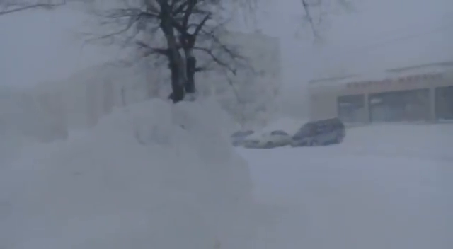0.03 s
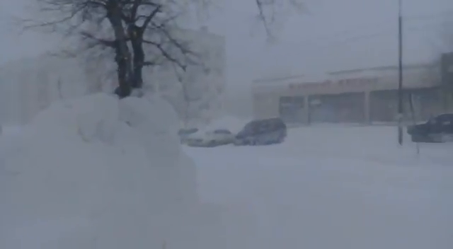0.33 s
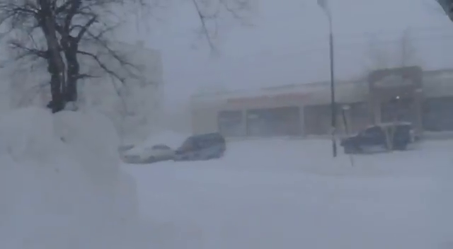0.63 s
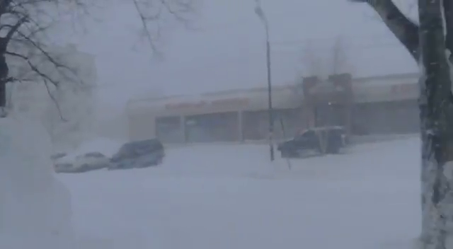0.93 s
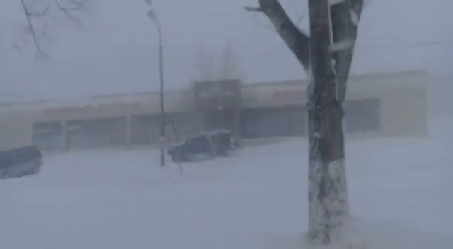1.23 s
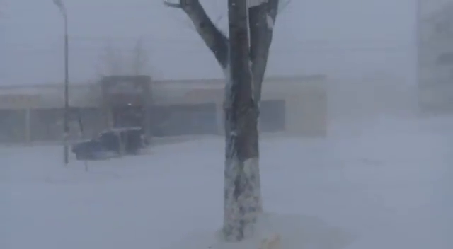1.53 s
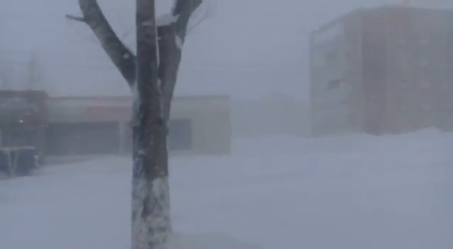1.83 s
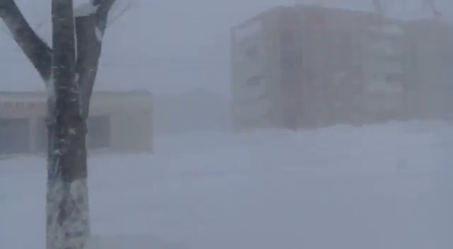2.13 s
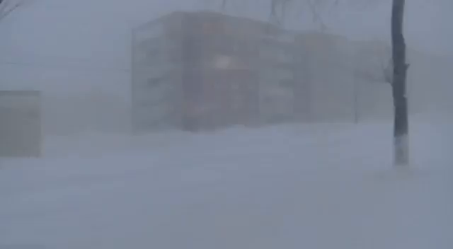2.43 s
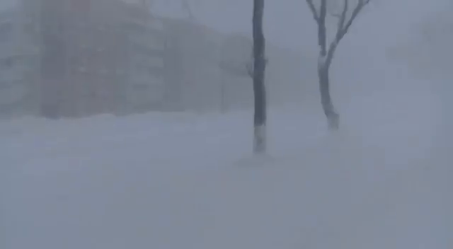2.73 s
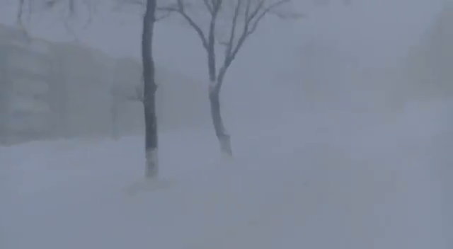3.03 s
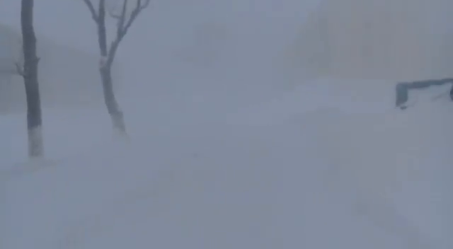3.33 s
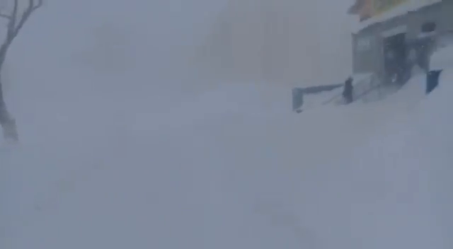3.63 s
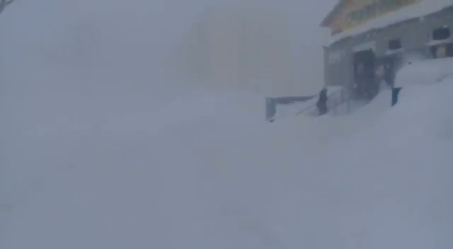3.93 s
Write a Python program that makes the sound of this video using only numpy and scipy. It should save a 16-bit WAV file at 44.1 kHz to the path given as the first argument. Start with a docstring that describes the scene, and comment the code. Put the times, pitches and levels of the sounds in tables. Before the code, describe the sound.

Wind buffets a bare microphone in rough, uneven blasts during a blizzard in town. It then eases to a softer rumble as a hand knocks the case a few times and blown snow faintly hisses and crackles.

```python
"""A blizzard in a town street, heard through a bare hand-held microphone.
At first, gusts drag swirls of air over the microphone's opening, where they flutter and slap;
something rustles briefly. After two seconds it is turned out of the wind, leaving a low rumble
and softer slaps. Then the hand bumps the case a few times, snow ticks and crackles on the opening,
and a second rustle comes near the end. All along, the street roars faintly and blown snow hisses."""
import sys
import numpy as np
from scipy import signal
from scipy.fft import rfft, irfft
from scipy.io import wavfile
from scipy.ndimage import uniform_filter1d, minimum_filter1d, map_coordinates

SR = 44100
rng = np.random.default_rng(int(sys.argv[2]) if len(sys.argv) > 2 else 0)


def to_wav(sig):
    """Store sig (one row per channel, or 1-D mono) as 16-bit WAV at the path in sys.argv[1].

    Samples outside -1..1 are clipped; the rate is SR.
    """
    pcm = np.clip(np.atleast_2d(sig), -1, 1) * 32767
    pcm = np.round(pcm).astype(np.int16)
    wavfile.write(sys.argv[1], SR, pcm.T)  # frames by channels


N = 176400  # four seconds

# Five gusts, one list of rows each. Each row: time in seconds, level in dB, brightness in dB.
GUST_SHAPES = [
    [(0.0, -14.5, -17.5), (0.016, -28, -24.5), (0.03, -22.5, -15), (0.042, -18, -22), (0.076, -16.5, -13),
     (0.088, -8.5, -27.5), (0.098, -30.5, -9.5), (0.124, -25, -31), (0.208, -29, -18), (0.226, -15, -19.5),
     (0.238, -19, -30), (0.266, -40, -26.5), (0.298, -19.5, -42), (0.32, -26.5, -9.5),
     (0.366, -17.5, -37.5), (0.39, -66.5, -21)],
    [(0.39, -39, -16.5), (0.398, -59.5, -6), (0.406, -28.5, -29.5), (0.418, -19, -37.5),
     (0.434, -50, -20.5), (0.444, -22, -32.5), (0.452, -33.5, -14.5), (0.5, -18.5, -30.5),
     (0.512, -18, -18), (0.534, -16.5, -34), (0.544, -24, -20), (0.554, -21.5, -19), (0.59, -15.5, -14),
     (0.628, -27.5, -10), (0.66, -18, -32), (0.68, -33.5, -26.5)],
    [(0.68, -33, -28), (0.714, -12, -15), (0.754, -23, -23), (0.792, -11.5, -8), (0.804, -12, -24),
     (0.848, -29, -20), (0.868, -13, -19), (0.886, -13.5, -25), (0.916, -25, -31.5), (0.938, -13.5, -21),
     (0.966, -21, -33.5), (0.996, -21.5, -17), (1.01, -19, -30), (1.112, -19, -26.5), (1.144, -48.5, -6),
     (1.166, -26.5, -24.5), (1.18, -52, -15)],
    [(1.18, -53, -20), (1.214, -19, -36), (1.232, -20, -20), (1.26, -7, -19.5), (1.288, -33, -30.5),
     (1.304, -7.5, -19.5), (1.32, -44.5, -29.5), (1.33, -9.5, -24.5), (1.358, -26.5, -25),
     (1.372, -13, -22), (1.39, -19.5, -19.5), (1.502, -12, -19.5), (1.528, -10, -36), (1.54, -42.5, -27.5),
     (1.554, -12, -17.5), (1.61, -20.5, -37.5)],
    [(1.61, -20, -36), (1.628, -28, -18.5), (1.642, -19.5, -8.5), (1.668, -12, -16), (1.694, -24.5, -5.5),
     (1.704, -14, -13), (1.848, -16.5, -16.5), (1.862, -13, -10.5), (1.878, -17, -16.5), (1.966, -16, -21),
     (1.976, -25, -34.5), (2.002, -15, -17.5), (2.012, -15.5, -23), (2.03, -18.5, -29.5),
     (2.064, -31, -31.5), (2.09, -42, -8.5)],
]
# The tone of swirls passing at normal speed. Each row: frequency in Hz, level in dB.
SWIRL_TONE = [(30, -12.5), (110, 1), (250, 1), (450, -3), (750, -12.5), (1100, -21), (1600, -35),
              (2400, -48.5), (4000, -91)]

def gusts():
    """Wind sweeps swirls over the opening; as it flutters, faster air sounds louder and higher."""
    rows = [row for gust in GUST_SHAPES for row in gust]
    smoothing = int(0.0025 * SR) + 1
    level_db = uniform_filter1d(curve(rows), smoothing)
    bright_db = uniform_filter1d(curve(rows, column=2), smoothing)
    flutter = wobble(hz=189.07)
    normal_db, db_per_octave, top_octaves = -15, 17, 0.65
    # Brightness sets the speed: one octave up means twice as fast.
    octaves = np.clip((bright_db - normal_db) / db_per_octave, -0.95, 0.5) + 0.28 * flutter
    speed = 2 ** np.where(octaves > 0, top_octaves * np.tanh(octaves / top_octaves), octaves)
    swirls = steady(noise(SWIRL_TONE), seconds=0.019)
    pressure = map_coordinates(swirls, [np.cumsum(speed)], order=3, mode="mirror")
    pressure = cut_treble(pressure, hz=2300, order=4)  # the opening averages out the smallest swirls
    end_s, fade_s = rows[-1][0], 0.027
    in_wind = np.clip((end_s - np.arange(N) / SR) / fade_s, 0, 1)
    flapping_db = 4 * flutter + 2.08 * wobble(hz=67.63)
    return pressure * in_wind * from_db(level_db - 1 + flapping_db)

# Slaps of air, hard in the wind and softer out of it.
# Each row: time in seconds, level in dB, width in milliseconds.
AIR_SLAPS = [(.048, -0.5, 0.35), (0.062, -7, 0.28), (.076, -3, 0.27), (0.082, -10, 0.85), (0.098, -3, 0.31),
             (.106, -8, 0.47), (0.3227, -1, 0.34), (.454, -10.5, 0.46), (.484, -3.5, 0.67),
             (0.5445, 0.5, 0.58), (0.593, -5, 0.56), (0.601, -4.5, 0.29), (.695, -8, 0.71),
             (0.715, 0, 0.33), (0.731, -6, 0.35), (0.7709, 0, 0.45), (.7845, 0, 0.19), (0.7884, -2.5, 0.27),
             (0.792, 0, 0.2), (0.811, -6.5, .55), (0.87, -1, 0.67), (0.927, -5.5, 0.63), (0.937, -6, 0.6),
             (.995, -5.5, 0.37), (1.232, -11.5, 0.29), (1.25, -3, 0.72), (1.302, -2.5, 0.19),
             (1.304, 3, 0.9), (1.33, -7, 0.38), (1.35, -14, 0.7), (1.371, -1, 0.44), (1.416, -11, 0.55),
             (1.433, 0, 0.49), (1.459, -1, 0.56), (1.464, -3, 1.2), (1.483, -2, 0.53), (1.495, -3.5, 0.4),
             (1.499, -4, 0.36), (1.513, -6, 0.39), (1.557, -8, 0.78), (1.634, -7, 0.38), (1.644, 0, 0.35),
             (1.652, -6, 0.38), (1.659, -3.5, 0.28), (1.665, -11.5, 0.33), (1.682, -3, 0.24),
             (1.705, -3.5, 0.24), (1.716, -2.5, 0.26), (1.725, -7.5, 0.16), (1.744, -6, 0.28),
             (1.785, -0.5, 0.38), (1.822, -9, 0.24), (1.851, -10, 0.2), (1.862, -1.5, 0.17),
             (1.889, -6, 0.18), (1.919, -7, 0.26), (1.939, -0.5, 0.5), (1.962, -5.5, 0.28),
             (2.002, -3.5, 0.41), (2.162, -23.5, 0.35), (2.513, -10, 1.1), (2.576, -23.5, 0.95),
             (3.252, -18, 1.45), (3.385, -17, 1.7), (3.622, -16, 1.45), (3.702, -17, 1.4),
             (3.898, -22, 2.5)]

def slaps():
    """A single swirl pushes or sucks at the opening, the air swings back, and a smaller swirl follows."""
    t, out = np.arange(N) / SR, np.zeros(N)
    for (at, db, width_ms), (side, lag) in zip(AIR_SLAPS, rng.random((len(AIR_SLAPS), 2))):
        near = abs(t - at) < 0.06
        age = np.clip((t[near] - at) * 1000 / width_ms, -60, 60)  # counted in slap widths
        spike = 1 / np.cosh(age) ** 2
        swing_back = from_db(-9) / np.cosh((age - 4.68) / 3.5) ** 2
        follower = from_db(-10) / np.cosh(age - 5 * (1 + lag)) ** 2
        push_or_suck = np.sign(side - 0.5)
        out[near] += push_or_suck * from_db(db) * (spike - swing_back + follower)
    return cut_treble(out, hz=3000, order=2)  # the opening rounds off the tips

# How hard the air shakes the case. Each row: time in seconds, level in dB.
RUMBLE_LOUDNESS = [(0.0, -17.5), (0.1, -25), (0.12, -26.5), (0.37, -25), (0.39, -50.5), (0.49, -19.5),
                   (0.68, -39), (0.79, -11), (0.85, -31.5), (0.88, -16.5), (0.97, -25.5), (1.07, -25.5),
                   (1.18, -35.5), (1.25, -18), (1.35, -23), (1.48, -17), (1.55, -27.5), (1.73, -18),
                   (1.84, -19), (1.85, -15), (1.98, -16.5), (2.08, -27), (2.18, -31.5), (2.31, -36),
                   (2.47, -31.5), (2.52, -25.5), (2.59, -25), (2.63, -33.5), (2.7, -25.5), (2.85, -31.5),
                   (3.19, -35.5), (3.25, -30.5), (3.31, -39), (4.0, -37)]
# The rumble's deep tone. Each row: frequency in Hz, level in dB.
RUMBLE_TONE = [(20, -24.5), (35, -15), (55, -8.5), (85, 2), (120, 1.5), (180, -4), (280, -16), (450, -30),
               (800, -42), (2000, -87)]

def rumble():
    """Big, slow swirls roll around the case, even when it is out of the wind."""
    swirls = steady(noise(RUMBLE_TONE), seconds=0.11)
    return swirls * from_db(curve(RUMBLE_LOUDNESS) + 1 + 3.5 * wobble(hz=45.48))

# The hand knocking the case. Each row: time in seconds, push level in dB, push width in
# milliseconds, click level in dB, thud level in dB, thud pitch in Hz.
HAND_BUMPS = [(2.192, -7, 0.19, -27.5, -17.5, 330), (2.239, -32.5, 0.11, -40, -37, 696),
              (2.678, -21, 0.19, -52, -25, 367), (2.7158, -26.5, 0.21, -24, -24, 330),
              (2.9191, -17, .36, -45, -24, 464), (2.9198, -19.5, 0.076, -16, -26.5, 450),
              (2.992, -31, 0.21, -56, -30.5, 1390), (3.517, -43, 0.49, -60, -22.5, 350)]

def hand_bumps():
    """Each bump pushes and pulls the microphone once, with a sharp click and a dull thud of the case."""
    t, body, clicks = np.arange(N) / SR, np.zeros(N), np.zeros(N)
    thud_decay_s, click_decay_s = 0.0017, 0.00071
    for at, push_db, width_ms, click_db, thud_db, thud_hz in HAND_BUMPS:
        age = (t - at) * 1000 / width_ms  # counted in push widths
        after_s = np.clip(t - at, 0, 0.05)
        body -= from_db(push_db) * age * np.exp((1 - age ** 2) / 2)
        body -= from_db(thud_db) * np.sin(2 * np.pi * thud_hz * after_s) * np.exp(-after_s / thud_decay_s)
        clicks -= from_db(click_db) * (t >= at) * np.exp(-after_s / click_decay_s)
    return body + cut_treble(clicks, hz=7800, order=1)

# Two rustles. Each row: start in seconds, length in seconds, level in dB.
RUSTLE_TIMES = [(0.141, 0.1, -37.5), (3.19, 0.26, -42)]
# The tone of the rubbing. Each row: frequency in Hz, level in dB.
RUSTLE_TONE = [(100, -7.5), (400, 8.5), (800, 4.5), (1300, 8.5), (1900, 5), (2400, -14.5), (3000, -21),
               (4300, -18), (6000, -33.5), (9000, -37.5), (16000, -50)]

def rustles():
    """Short, grainy rubbing swells and fades, like a sleeve or a step in snow."""
    t, swell, fade_s = np.arange(N) / SR, np.zeros(N), 0.08
    for start, length, db in RUSTLE_TIMES:
        nearest_end_s = np.minimum(t - start, start + length - t)
        swell += from_db(db) * np.clip(nearest_end_s / fade_s, 0, 1)
    return swell * noise(RUSTLE_TONE) * from_db(5 * wobble(hz=350))

# The storm's strength. Each row: time in seconds, roar level in dB, hiss level in dB.
STORM_LOUDNESS = [(0, -49, -69), (.2, -60, -68.5), (.35, -57, -75.5), (.85, -50.5, -72),
                  (1.0, -56.5, -78.5), (1.15, -50.5, -75), (1.42, -51.5, -68.5), (1.6, -57, -80),
                  (1.9, -53, -71.5), (2.13, -51.5, -72.5), (2.33, -60, -77.5), (2.6, -58, -76),
                  (2.9, -52, -68.5), (3.15, -50.5, -74.5), (3.52, -52, -75.5), (3.67, -53, -68.5),
                  (3.83, -47.5, -74.5), (4, -56, -76)]
# The tones of the wind's roar and the snow's hiss. Each row: frequency in Hz, level in dB.
ROAR_TONE = [(100, -4.5), (350, 6.5), (700, 4.5), (1000, -1.5), (1500, -0.5), (2000, -5.5), (2400, -21),
             (2900, -39), (5000, -57)]
HISS_TONE = [(1500, -7.5), (3200, -3), (3900, 4), (4800, -3), (6200, -14), (8000, -15.5), (11000, -19.5),
             (16000, -23)]

def street_storm():
    """Wind roars in the street and drifting snow hisses, each wavering a little."""
    roar = noise(ROAR_TONE) * from_db(curve(STORM_LOUDNESS) + 3 * wobble(hz=27))
    hiss = noise(HISS_TONE) * from_db(curve(STORM_LOUDNESS, column=2) + 3 * wobble(hz=29))
    return roar + hiss

# Icy grains landing. Each row: time in seconds, level in dB.
ICE_HITS = [(1.7777, -10.5), (1.7795, -17), (2.156, -47), (2.352, -61), (2.476, -45), (2.492, -41.5),
            (3.019, -36.5), (3.448, -42.5)]
# The tone of one tick. Each row: frequency in Hz, level in dB.
TICK_TONE = [(500, -16), (2500, -2.5), (4000, -3.5), (5500, -11), (8500, -6.5), (11000, 3), (13500, -10),
             (16000, -17)]

def ice_ticks():
    """A few large icy grains strike the opening and make its tiny hollow ring."""
    hits = np.zeros(N)
    for at, db in ICE_HITS:
        hits[int(at * SR)] += from_db(db)
    return shape_tone(hits, TICK_TONE)

# How hard the fine snow lands. Each row: time in seconds, level in dB.
SNOW_LOUDNESS = [(0, -83.5), (2.1, -80.5), (2.3, -71), (2.58, -75.5), (2.7, -64), (2.78, -73),
                 (2.87, -69.5), (3.04, -67.5), (3.12, -77.5), (3.65, -71.5), (4, -80)]
# The tone of its crackle. Each row: frequency in Hz, level in dB.
SNOW_TONE = [(1000, -10.5), (3000, -9.5), (5600, 0), (7000, -7.5), (9000, -10), (10800, 0.5), (12000, -4),
             (13500, -3), (16000, -10)]

def fine_snow():
    """Fine snow peppers the opening in flurries: a faint crackle of grains of all sizes."""
    grains_per_second, spread_db = 2100, 2
    sizes = from_db(spread_db * np.minimum(rng.exponential(size=N), 5))
    lands = rng.random(N) < grains_per_second / SR
    hits = lands * rng.choice([-1, 1], N) * sizes
    flurries = from_db(curve(SNOW_LOUDNESS) + 3.5 * wobble(hz=21.97))
    return shape_tone(hits / np.std(hits) * flurries, SNOW_TONE)

def from_db(db):
    """Turns decibels (dB) into a number to multiply a sound by."""
    return 10 ** (np.asarray(db) / 20)

def curve(rows, column=1):
    """Joins one column of a table with straight lines over time."""
    rows = np.array(rows)
    return np.interp(np.arange(N) / SR, rows[:, 0], rows[:, column])

def shape_tone(x, tone):
    """Filters a sound to follow a tone table; plain white noise keeps its power."""
    hz, db = np.array(tone).T
    gain = from_db(np.interp(np.log(np.fft.rfftfreq(N, 1 / SR) + 1), np.log(hz), db))
    gain /= np.sqrt(np.mean(gain ** 2))
    # Folding the second half onto the first makes the filter ring after a hit, never before it.
    folded = irfft(np.log(gain), N)
    folded[1:N // 2] *= 2
    folded[N // 2 + 1:] = 0
    return irfft(rfft(x) * np.exp(rfft(folded)), N)

def noise(tone):
    """Random noise with the given tone and a power of about one."""
    return shape_tone(rng.standard_normal(N), tone)

def wobble(hz):
    """A smooth random wiggle, mostly between -1 and 1, with hz new values a second."""
    values = np.clip(rng.standard_normal(N), -2, 2)
    return map_coordinates(values, [np.arange(N) * hz / SR], order=3, mode="mirror")

def steady(x, seconds):
    """Evens out the slow swells of a noise."""
    window = np.hanning(int(seconds * SR)) * 2 / (seconds * SR)
    return x / np.sqrt(signal.fftconvolve(x ** 2, window, "same"))

def cut_treble(x, hz, order):
    """Softens everything above hz; a higher order cuts more steeply."""
    return signal.sosfilt(signal.butter(order, hz, fs=SR, output="sos"), x)

def scene():
    """Adds everything into one channel; gusts, slaps and bumps lose their deepest bass."""
    bass_cut = signal.butter(2, 75.5, "high", fs=SR, output="sos")
    close_up = signal.sosfilt(bass_cut, gusts() + slaps() + hand_bumps())
    return (close_up + rumble() + street_storm() + rustles() + fine_snow() + ice_ticks())[None]

def record(dry):
    """Turns the sound down smoothly around peaks above full scale, then cuts the highest treble."""
    ceiling, smoothing, top_hz = 1.0, 129, 16500
    gain = minimum_filter1d(ceiling / np.maximum(abs(dry), ceiling), 2 * smoothing)
    gain = uniform_filter1d(uniform_filter1d(gain, smoothing), smoothing)
    return signal.sosfilt(signal.ellip(8, 0.2, 70, top_hz, fs=SR, output="sos"), dry * gain)

dry = scene()
out = record(dry)
to_wav(out)
```